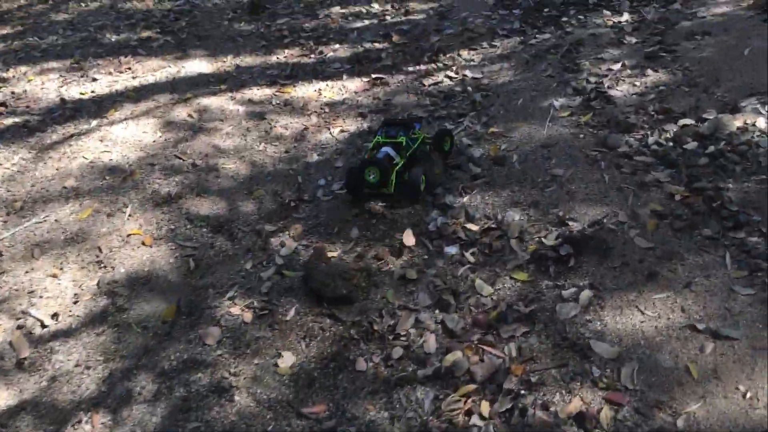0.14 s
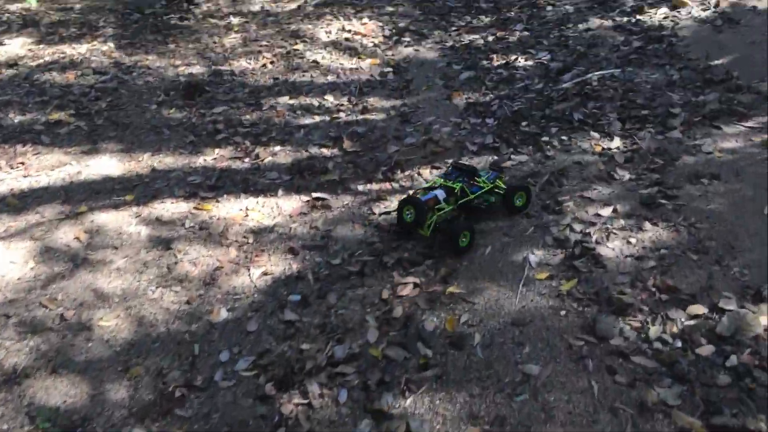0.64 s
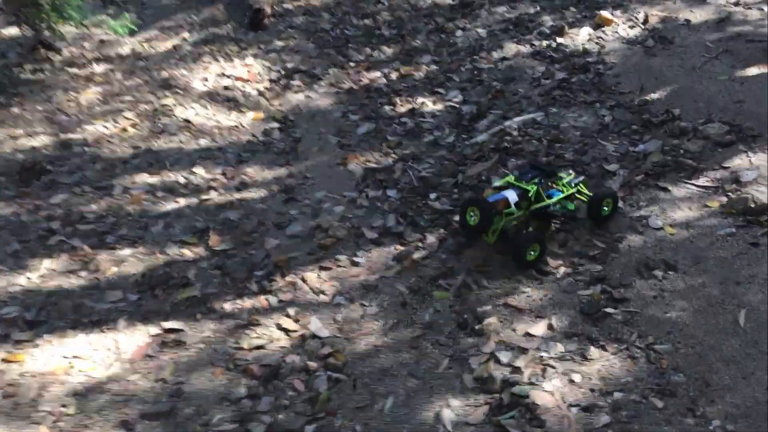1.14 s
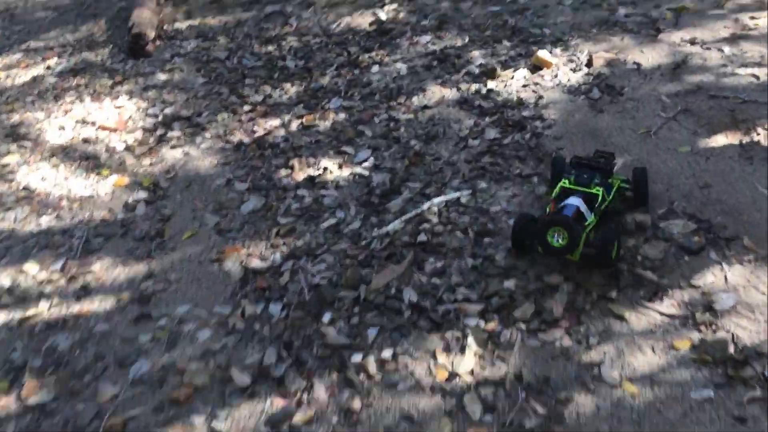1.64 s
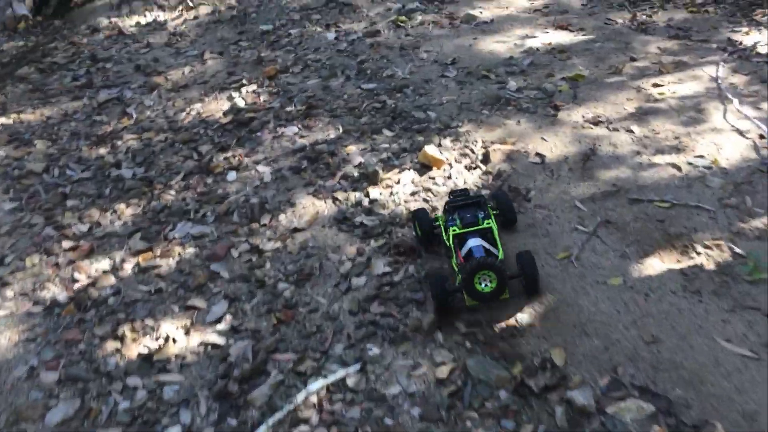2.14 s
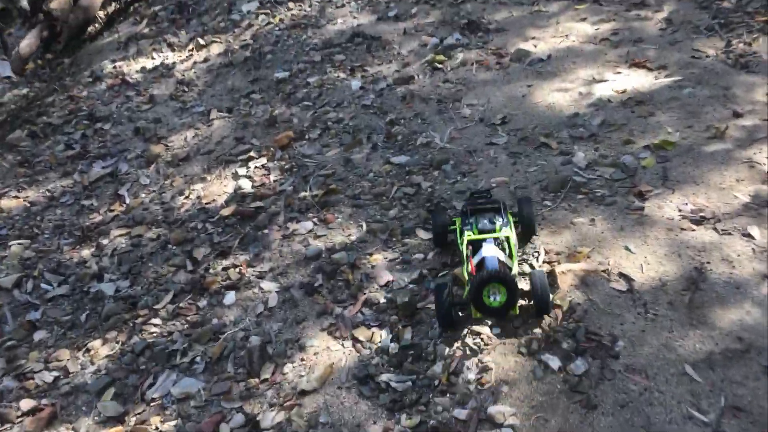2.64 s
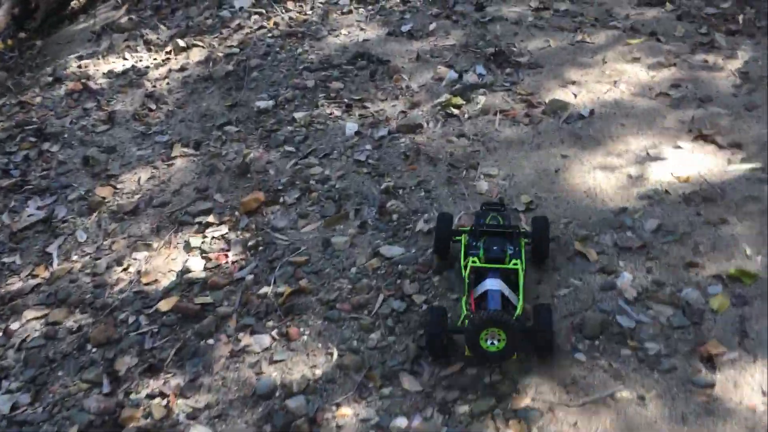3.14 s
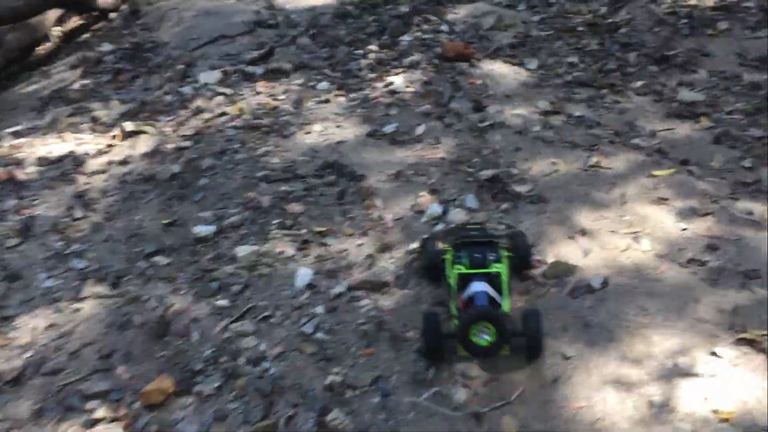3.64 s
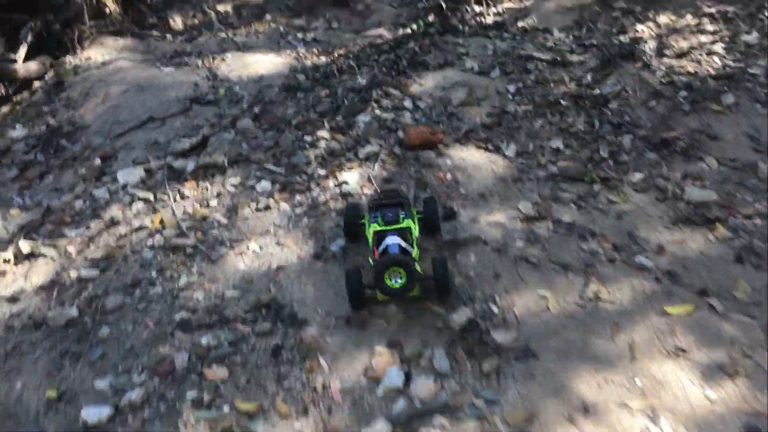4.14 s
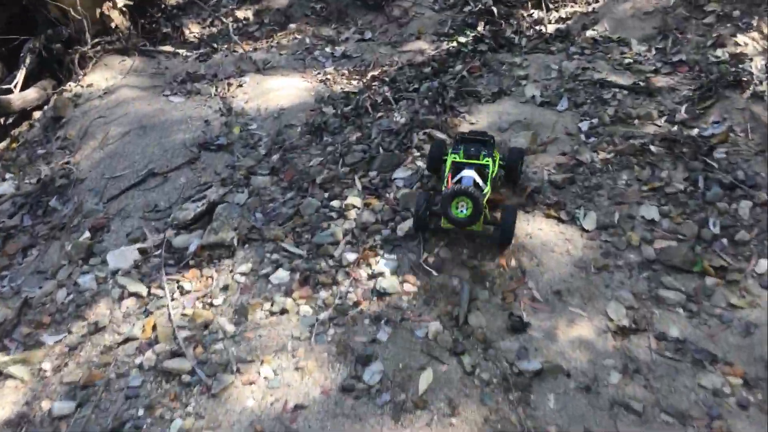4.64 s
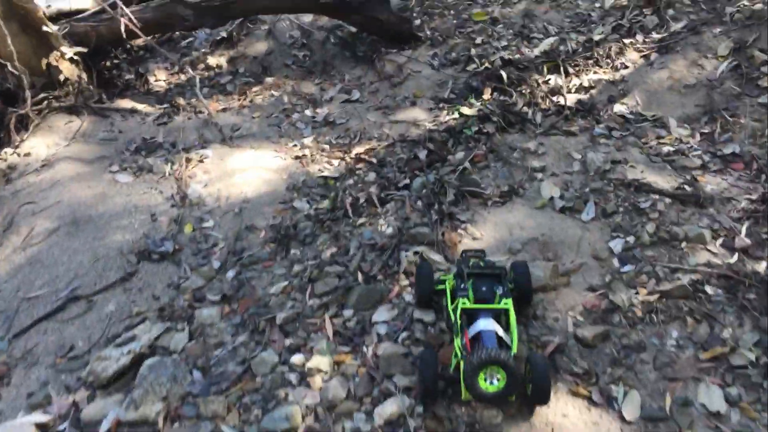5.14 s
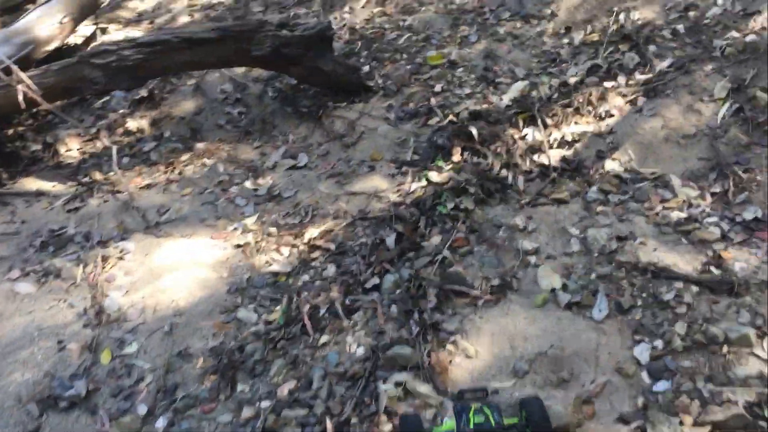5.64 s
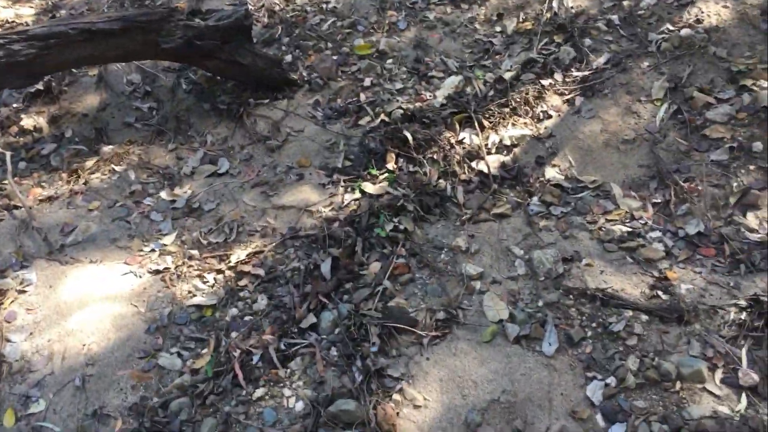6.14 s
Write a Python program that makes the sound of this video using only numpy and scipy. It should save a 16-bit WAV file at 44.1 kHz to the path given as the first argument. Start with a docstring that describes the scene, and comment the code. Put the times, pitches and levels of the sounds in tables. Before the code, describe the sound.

Close nasal gear whine and plastic chatter, tyres crunching leaves and gravel outdoors, a stone knock, a brief slack-geared raspy rattle, then near silence.

```python
"""A nasal gear whine and plastic rattle pass over crackling leaves: a small electric toy crawler, slow, close by.
Outdoors, hand-held microphone: faint air, wind thumps and ground rumble lie behind gravel and dry leaves.
Sine tones make the whine and the speed controller's whistle; random knocks ring the chassis resonances.
Filtered clicks and noise make grit and leaves; decaying modes make a flicked stone and the slapping shell.
Near the end it rolls back down a slope with slack gears, the shell slaps its posts, and it stops."""
import sys
import numpy as np
from scipy import signal
from scipy.io import wavfile
from scipy.ndimage import uniform_filter1d

SR = 44100
rng = np.random.default_rng(int(sys.argv[2]) if len(sys.argv) > 2 else 0)


def wav_record(signal):
    """Record a signal, one row per channel, as 16-bit PCM in the file named by sys.argv[1]."""
    frames = np.transpose(np.atleast_2d(signal))
    bounded = np.clip(frames, -1, 1)
    # unit amplitude maps onto the largest positive 16-bit level
    quanta = np.round(bounded * 32767).astype(np.int16)
    wavfile.write(sys.argv[1], SR, quanta)


def makeup_ratio(level_db):
    """Linear amplitude ratio for a level in decibels (20 dB per factor of ten)."""
    decades = np.asarray(level_db, float) / 20
    return 10 ** decades


N = 276066  # samples, 6.26 s

# still outdoor air: f/Hz, relative level per Hz/dB
AIR_COLOUR = [(15, -82), (25, 0.5), (104, -8), (165, -12), (247, -7.5), (315, -48), (498, -11.5),
              (602, -12), (1250, -22.5), (6810, -41), (15700, -85)]
# ground rumble of wheels and steps: t/s, level/dB
RUMBLE_LEVEL = [(0, -54.5), (1.06, -61), (1.57, -58), (2.32, -59.5), (2.7, -56), (4.58, -58.5),
                (5.04, -61.5), (6.26, -67)]
# colour of that rumble: f/Hz, relative level per Hz/dB
GROUND_COLOUR = [(15, -41), (25, -38), (59, 3.5), (151, 1), (283, 3.5), (369, 4), (480, -2.5), (617, -1.5),
                 (700, 0.5), (910, 3), (1540, -120)]
# thumps of wind on the microphone: t/s, level/dB, f/Hz
WIND_THUMPS = [(0.06, -37, 53.4), (0.32, -36, 87.2), (1.515, -29, 93.7), (3.598, -46, 86.1),
               (5.247, -33, 68.2)]
# whistle of the speed controller: t/s, level/dB
WHISTLE_LEVEL = [(.12, -55), (.8, -57), (.93, -50), (1.1, -49), (1.33, -49.5), (1.5, -54), (1.65, -48.5),
                 (1.85, -51), (2.03, -45.5), (2.3, -52), (2.55, -48), (2.65, -58), (2.72, -50), (2.85, -56),
                 (3.0, -49), (3.5, -52), (4.07, -48.5), (4.3, -48), (4.68, -49), (4.78, -50), (4.92, -48.5),
                 (5.15, -51)]
# its base pitch: t/s, f/Hz
WHISTLE_PITCH = [(0, 2024), (4.98, 2024), (5.03, 2029)]
# its harmonics: multiple of the base pitch, relative level/dB
WHISTLE_HARMONICS = [(1, -8), (2, 0), (3, -20), (4, -22)]
# steering servo holding still: t/s, level/dB
SERVO_LEVEL = [(5.9, -74), (6.04, -63), (6.08, -76), (6.26, -83)]
# tones of the servo: f/Hz, level/dB (used relative to the first)
SERVO_TONES = [(1227, -58), (2482, -68), (4904, -77)]
# tyres grinding grit: t/s, level/dB
GRIND_LEVEL = [(0, -41.5), (.85, -48), (1.3, -44.5), (1.55, -42), (1.64, -50.5), (1.8, -48), (2.03, -50),
               (2.4, -43), (2.58, -47), (2.65, -51), (2.76, -50.5), (2.9, -42), (2.97, -49), (3.3, -48),
               (3.7, -43.5), (4.2, -45.5), (4.97, -49.5), (5.05, -56), (5.35, -41), (5.8, -52.5),
               (5.95, -63.5), (6.25, -78.5)]
# colour of the grit: f/Hz, relative level per Hz/dB
GRIT_COLOUR = [(1180, -15), (2000, 4), (2440, 3.5), (2900, -2.5), (3850, 1.5), (4130, -0.5), (4950, -2),
               (8810, -2), (10300, -5.5), (12200, -3.5), (15700, -5.5)]
# leaves crushed under a tyre: middle t/s, level/dB, length/s, tilt of the lows/dB
LEAF_CRUNCHES = [(0.036, -48, 0.048, -8), (0.147, -40.5, 0.11, -4), (0.34, -41.5, 0.071, 3.5),
                 (0.399, -50, 0.019, -8), (0.454, -48.5, 0.12, -8), (0.481, -50.5, 0.029, 11),
                 (0.58, -49, 0.017, -7), (0.67, -38.5, 0.03, 1), (0.807, -44, 0.07, 5),
                 (0.926, -55, 0.027, 16), (1.08, -50, 0.0353, 14.5), (1.182, -49, 0.046, -5),
                 (1.263, -38.5, 0.035, 8.5), (1.352, -49, 0.022, 12), (1.527, -44, 0.015, -4),
                 (1.565, -42, 0.049, 2), (1.707, -38, 0.021, 4), (1.779, -49, 0.021, 4),
                 (1.847, -44, 0.0096, 1), (1.877, -42, 0.022, 5.5), (1.913, -45.5, 0.012, 11),
                 (1.929, -36, 0.016, -4), (1.953, -40, 0.013, -9), (2.023, -47, 0.014, -10),
                 (2.108, -39, 0.05, -3), (2.16, -51, 0.036, -6), (2.265, -45, 0.011, -7),
                 (2.411, -37.5, 0.06, 2.5), (2.466, -44, 0.043, 1), (2.542, -39, 0.024, -6),
                 (2.585, -48, 0.071, 0), (2.775, -49, 0.02, 12.5), (2.924, -42.5, 0.05, 8),
                 (3.051, -37, 0.047, 4), (3.107, -49, 0.03, -2), (3.57, -47, 0.043, 13),
                 (3.606, -43.5, 0.02, -1), (3.817, -37.5, 0.068, 6.5), (3.856, -39, 0.012, -10),
                 (4.007, -45.5, 0.092, -2), (4.203, -46.5, 0.04, 6), (4.365, -39.5, 0.017, 3.5),
                 (4.627, -47, 0.083, -7), (4.86, -53, 0.068, -11), (4.946, -44, 0.02, 8),
                 (4.995, -47, 0.017, 11), (5.272, -42.5, 0.04, 6), (5.328, -42, 0.023, -11),
                 (5.409, -34.5, 0.032, 5), (5.452, -42.5, 0.065, -4), (5.552, -45, 0.03, 4),
                 (5.64, -46, 0.087, -1), (5.745, -53, 0.035, 12), (5.89, -60, 0.014, 3),
                 (5.901, -59, 0.0096, 8.5)]
# colour of the leaves: f/Hz, relative level per Hz/dB
LEAF_COLOUR = [(350, -24.5), (600, -2.5), (1060, -0.5), (2350, -5.5), (3310, -4.5), (4120, -1.5),
               (5560, -0.5), (13300, -1.5), (15700, -16)]
# ticks of breaking leaf fragments, large to small: f/Hz
FRAGMENT_PITCHES = [2620, 3500, 4270, 5530, 7000, 8800, 11240, 12700, 15000]
# sharp cracks of a twig or leaf stem: t/s, peak/dB, f/Hz
STEM_CRACKS = [(0.1153, -17, 9000), (0.411, -19, 12800), (0.4471, -20, 7000), (.495, -21, 9130),
               (0.739, -27, 11020), (.7806, -33, 8000), (0.798, -32, 6000), (.804, -24, 11500),
               (1.159, -34, 7000), (1.363, -30, 9000), (1.4622, -31, 7000), (1.4965, -25, 8940),
               (1.527, -25, 12000), (1.5519, -21, 9500), (1.6774, -27, 10500), (1.7045, -27, 8970),
               (1.7685, -21, 12500), (1.8677, -31, 8030), (1.882, -28, 9230), (1.9237, -20, 10500),
               (1.932, -25, 9000), (1.952, -34, 6000), (2.0217, -20.5, 7600), (2.0882, -23, 6000),
               (2.105, -15.5, 12000), (2.1123, -16, 8800), (2.165, -20, 9000), (2.1877, -20.5, 9360),
               (2.5301, -27, 6000), (2.7678, -35, 3980), (2.9857, -33, 6000), (3.03, -16, 9260),
               (3.0505, -13, 9440), (3.0817, -24, 8990), (3.1004, -24, 11000), (3.3583, -25, 12000),
               (3.8572, -21, 12040), (4.359, -18, 6240), (4.8164, -34, 7000), (4.836, -24, 13400),
               (4.936, -22, 8600), (5.115, -26.5, 10200), (5.2564, -16, 12000), (5.688, -29, 7500),
               (5.9501, -36, 7700)]
# a stone flicked against the chassis, and its bounces: t/s, peak/dB
STONE_HITS = [(2.579, -8), (2.5888, -18), (2.6005, -27)]
# modes the stone excites: f/Hz, relative level/dB, t60/s
STONE_MODES = [(1500, -21, 0.034), (1916, 20.5, 0.0066), (2570, 3, 0.0067), (3720, 0, 0.016),
               (6000, -9, 0.007)]
# chassis groaning low as it settles: t/s, peak/dB, starting f/Hz, length/s, end pitch over starting pitch
SETTLING_GROANS = [(5.607, -39, 528.5, 0.03, 0.5), (5.705, -34.5, 524, 0.039, 0.4),
                   (5.844, -42.5, 482, 0.0072, 0.79), (5.896, -56, 400, 0.025, 1)]
# gear teeth taking up play: t/s, peak of the note/dB, starting f/Hz
TOOTH_CLACKS = [(0.12, -34.5, 1084), (0.149, -30, 1024), (.825, -40, 1390), (.865, -39.5, 1370),
                (1.115, -38, 1360), (1.139, -43, 1360), (1.16, -40, 1310), (1.204, -39, 1340),
                (1.235, -39, 1333), (1.265, -41, 1370), (1.575, -39.5, 1320), (1.783, -32, 1375),
                (2.194, -31, 1350), (2.228, -31, 1382), (2.276, -31, 1363), (2.321, -27, 1409),
                (2.345, -30, 1390), (2.398, -32, 1415), (2.419, -36, 1440), (2.624, -37, 1400),
                (2.657, -33, 1333), (2.684, -34.5, 1150), (2.725, -32.5, 1381), (3.057, -30.5, 1430),
                (3.112, -32, 1214), (3.206, -31, 1388), (3.228, -30, 1437), (3.278, -30, 1415),
                (3.303, -27.5, 1411), (3.33, -30, 1482), (3.372, -37, 1400), (3.415, -27.5, 1340),
                (4.64, -39, 1302), (5.117, -35, 1360), (5.148, -29.5, 1354), (5.229, -25.5, 1330),
                (5.269, -20, 1540), (5.28, -20.5, 1403), (5.343, -23, 1434), (5.541, -32.5, 985),
                (5.586, -32, 1290), (5.631, -28, 1198), (5.655, -22.5, 1063), (5.701, -32, 1243),
                (5.809, -33.5, 1445), (5.823, -31.5, 1200), (5.881, -40, 1310), (5.899, -42.5, 1120),
                (5.971, -47, 1240)]
# body shell slapping its posts while rolling back: t/s, peak/dB, approximate pitch of the struck panel f/Hz
SHELL_SLAPS = [(5.1791, -28, 4700), (5.1968, -29, 3570), (5.2144, -26.5, 3590), (5.232, -24.5, 3400),
               (5.27, -20, 4650), (5.282, -26, 5540), (5.308, -32, 3454), (5.3256, -28, 3390),
               (5.3635, -24.5, 8800), (5.3725, -31, 3490), (5.4005, -19.5, 3410), (5.4407, -39, 3402),
               (5.4591, -35, 3500), (5.5338, -29, 3510), (5.5724, -35, 3180), (5.5973, -27, 3390),
               (5.6605, -28.5, 3400), (5.7214, -47, 5300), (5.7403, -38, 5400), (5.7751, -33.5, 4140),
               (5.823, -44, 4500)]
# modes of the shell: f/Hz, relative level/dB, t60/s
SHELL_MODES = [(3400, -3, .015), (4680, -3, .014), (5590, -5, .014), (6730, -7, .012), (8760, -6, .012),
               (12000, -8, .008)]
# drive train shaking the chassis: t/s, level/dB
RATTLE_LEVEL = [(0, -46), (.13, -45.5), (.45, -50), (.85, -46.5), (1.5, -43.5), (1.64, -47), (1.8, -42),
                (2.08, -43.5), (2.6, -38), (2.75, -40), (2.9, -36), (2.97, -40), (3.5, -38.5),
                (3.64, -33.5), (3.77, -39), (4.5, -41.5), (5.0, -44.5), (5.04, -57), (5.09, -55),
                (5.15, -41.5), (5.28, -39), (5.297, -45), (5.33, -35), (5.36, -45.5), (5.405, -36.5),
                (5.43, -41.5), (5.46, -36), (5.53, -51), (5.6, -42), (5.68, -42.5), (5.78, -51.5),
                (5.83, -47.5), (5.87, -58), (6.0, -72.5), (6.26, -69.5)]
# chassis resonances: f/Hz, width/Hz, level under power re rattle/dB
CHASSIS = [(1000, 264, -10), (1438, 250, -8), (1800, 350, -7.5)]
# change of each chassis resonance once the gears run slack: level/dB
CHASSIS_SLACK = [4, 8.5, -0.5]
# loose shell and gear cover: f/Hz, width/Hz, level under power re rattle/dB, slope per octave of gear speed/dB,
# level rolling free re rattle/dB, slope rolling free/dB
LOOSE_PARTS = [(3483, 300, -19, 16, -19.5, 22.2), (4600, 970, -15, 15, -23, 14.7)]
# motor mount: f/Hz, width/Hz
MOUNT = (2890, 150)
# ring of the mount: t/s, level re rattle/dB
MOUNT_LEVEL = [(0, -8), (.5, -4), (1.15, -5.5), (1.35, -2.5), (1.6, -7.5), (1.9, -15), (2.3, -7.5),
               (2.62, -12), (2.9, -11), (3.3, -12.5), (3.75, -9.5), (4.5, -10), (4.7, -12.5), (5.1, -18.5),
               (6.26, -14)]
# low sway of the motor on its mount: f/Hz, width/Hz, level re the mount/dB
MOUNT_SWAY = (390, 100, -12.5)
# screech of the pinion: f/Hz, width/Hz
PINION = (4210, 630)
# level of the screech: t/s, level re rattle/dB
SCREECH_LEVEL = [(0, -6), (.1, 4), (.15, -15), (.6, -9), (3.4, -21), (3.7, -13), (4.1, -5.5), (4.35, -7.5),
                 (4.6, -7.5), (4.7, -13), (6.26, -22)]
# gear train, driven by the motor and at the end by the wheels rolling back: t/s, mean tooth rate f/Hz, load level/dB
GEAR_TRAIN = [(0, 944, -52), (.035, 964, -43), (.075, 821.3, -47), (.14, 1020, -59), (.19, 838, -42),
              (.4, 846, -51), (.62, 761, -52.5), (.71, 806, -47.5), (.75, 760, -54), (.8, 735, -52.5),
              (.94, 790, -44.5), (1.0, 704.5, -51), (1.08, 869, -47.5), (1.13, 720, -46),
              (1.22, 738, -44.5), (1.28, 687, -52), (1.33, 732.6, -46.5), (1.47, 790, -44),
              (1.57, 740, -46.5), (1.63, 598, -52), (1.7, 719, -47), (2.03, 523.6, -60), (2.2, 656.4, -47),
              (2.37, 680, -43.5), (2.47, 803, -42.5), (2.53, 693, -42), (2.62, 687.5, -43.5),
              (2.69, 578, -61), (2.73, 719, -50), (2.77, 674, -44), (2.81, 747, -51), (2.85, 900, -45),
              (2.88, 793, -49.5), (2.92, 1012, -39.5), (3.0, 626, -54), (3.19, 587.7, -65),
              (3.23, 708, -39.5), (3.27, 618.5, -48), (3.33, 738, -46), (3.37, 792, -43),
              (3.42, 675.4, -38.5), (3.46, 796, -39.5), (3.56, 1040, -52), (3.62, 875, -44.5),
              (3.76, 909.4, -46.5), (3.82, 813, -48.5), (3.88, 1013, -41), (4.04, 797.5, -43),
              (4.1, 884, -45.5), (4.36, 897, -48.5), (4.41, 775, -50), (4.45, 938, -44.5),
              (4.5, 803, -44.5), (4.63, 736, -42.5), (4.68, 706, -81), (5.16, 752, -87), (5.18, 829, -45),
              (5.21, 1000, -38), (5.245, 1123, -36.5), (5.28, 1500, -45), (5.33, 1715, -33),
              (5.44, 1723, -37), (5.6, 1313, -45.5), (5.77, 1148, -46.5), (5.8, 1081, -94)]
# octave of the tooth tone, before the chassis colours both: t/s, level re tooth tone/dB
OCTAVE_LEVEL = [(0, -1.5), (.5, -30), (.7, 1.5), (.85, -8), (1.0, -11), (1.2, -3.5), (1.35, -19),
                (1.48, -4), (1.6, -7.5), (2.0, 0), (2.35, -6), (2.62, -2), (2.72, 7), (2.85, -6),
                (2.93, -1), (3.0, 3), (3.1, 11.5), (3.3, -3), (3.42, -8), (3.47, -5.5), (3.65, 4),
                (4.0, -6), (4.6, -18), (5.2, -31), (5.42, -21), (5.6, 0)]
# higher overtones of the tooth tone: multiple, level re tooth tone/dB
OVERTONES = [(3, -22), (4, -20), (5, -22), (6, -27)]
# how well the chassis radiates a gear tone: f/Hz, gain/dB
CHASSIS_RADIATION = [(540, -9), (650, -16), (750, -2.5), (850, -0.5), (1050, 4), (1180, 5.5), (1380, 1.5),
                     (1560, -1), (1750, -3.5), (2100, -4), (2650, -20), (2890, -15), (3100, 8), (3300, 4),
                     (3600, 9), (3850, -29), (4300, 14), (4800, 15), (5600, -23)]

TEETH = 17  # tooth contacts per shaft turn
POWER_OFF_S = 5.06


def evened(x):
    """Scales to rms 1."""
    return x / np.sqrt(np.mean(x ** 2) + 1e-20)


def columns(rows):
    """Every column of a timed table, interpolated to one value per sample."""
    s, *rest = np.transpose(rows)
    return [np.interp(np.arange(N) / SR, s, c) for c in rest]


def gate(start_s, end_s, fade_s):
    """One between two moments, fading to zero outside."""
    return np.interp(np.arange(N) / SR, [start_s - fade_s, start_s, end_s, end_s + fade_s], [0, 1, 1, 0])


def drift(rate_hz):
    """Smooth chance of rms 1: noise below a low-pass corner at rate_hz."""
    low_pass = signal.butter(2, rate_hz, fs=SR, output="sos")
    return evened(signal.sosfilt(low_pass, rng.standard_normal(N)))


def coloured(x, points):
    """Causal minimum-phase filter of unit energy whose gain follows the shape of a (f/Hz, level/dB) table."""
    hz, db = np.transpose(points)
    log_gain = np.interp(np.log(np.fft.rfftfreq(4096, 1 / SR) + 1), np.log(hz), db) * np.log(10) / 20
    circle = np.r_[log_gain, log_gain[-2:0:-1]]
    taps = np.fft.ifft(np.exp(np.conj(signal.hilbert(circle)))).real
    return signal.oaconvolve(x, taps / np.linalg.norm(taps))[:N]


def resonate(x, hz, width):
    """A two-pole resonance of peak gain 1."""
    return signal.lfilter(*signal.iirpeak(hz, hz / width, SR), x)


def wandering(x, hz, width):
    """A steep resonance whose centre follows the curve hz: shift to zero, smooth twice, shift back."""
    turn = np.exp(2j * np.pi * np.cumsum(hz) / SR)
    r = np.exp(-np.pi * width / SR)
    return (turn * signal.lfilter([1], [1, -2 * r, r * r], x / turn)).real


def grains(per_s, spread_db):
    """Random clicks of either sign; a few are much larger than the rest."""
    size = makeup_ratio(spread_db * np.minimum(rng.exponential(1, N), 4)) * rng.choice([-1., 1.], N)
    return size * (rng.random(N) < per_s / SR)


def snapping(per_s, spread_db):
    """Each fragment breaks with a short tick at its own pitch."""
    ticks = [evened(resonate(grains(per_s, spread_db), hz, 0.15 * hz)) for hz in FRAGMENT_PITCHES]
    return evened(sum(ticks))


def radiated(hz):
    """Gain in dB of the chassis for a tone."""
    f, db = np.transpose(CHASSIS_RADIATION)
    return np.interp(np.log(hz), np.log(f), db)


def add(mix, s, sound):
    """Mixes a sound in at a moment."""
    part = mix[max(round(s * SR), 0):][:len(sound)]
    part += sound[:len(part)]


def outdoors():
    """Faint broadband noise of the place, and a lumpy low rumble through the ground."""
    air = makeup_ratio(-65.5) * evened(coloured(rng.standard_normal(N), AIR_COLOUR))
    lumpy = rng.standard_normal(N) * makeup_ratio(4.1 * drift(15.3))
    rumble = evened(coloured(lumpy, GROUND_COLOUR))
    return air + makeup_ratio(columns(RUMBLE_LEVEL)[0]) * rumble


def wind_thumps():
    """Dull thumps of wind on the microphone: low sines that swell and die within milliseconds."""
    out, t = np.zeros(N), np.arange(2000) / SR
    for s, db, hz in WIND_THUMPS:
        add(out, s, makeup_ratio(db) * np.sin(2 * np.pi * hz * t) * (t / 0.0062) * np.exp(1 - t / 0.0024))
    return out


def electronics():
    """Clean tones of the switching speed controller and, after the stop, of the servo."""
    turn = 2 * np.pi * np.cumsum(columns(WHISTLE_PITCH)[0] * (1 + 0.0012 * drift(12))) / SR
    whistle = sum(makeup_ratio(db + 2.0 * drift(9)) * np.sin(k * turn) for k, db in WHISTLE_HARMONICS)
    t = np.arange(N) / SR
    servo = sum(makeup_ratio(db - SERVO_TONES[0][1]) * np.sin(2 * np.pi * f * t) for f, db in SERVO_TONES)
    driving, holding = gate(0, 5.175, .02), gate(5.9, 7, .03)
    return makeup_ratio(columns(WHISTLE_LEVEL)[0]) * whistle * driving + makeup_ratio(columns(SERVO_LEVEL)[0]) * servo * holding


def tyres(crush_middle=0.42):
    """A bed of fine grit, and bursts of snaps while a leaf is crushed (crush_middle: share of its length)."""
    grit = evened(snapping(60, 3.2) + 1.7 * rng.standard_normal(N))
    grit = grit * makeup_ratio(1.6 * drift(29) + 1.8 * drift(9))
    bed = makeup_ratio(columns(GRIND_LEVEL)[0]) * coloured(grit, GRIT_COLOUR)
    burst, low = np.zeros(N), np.zeros(N)
    for s, db, length, tilt_db in LEAF_CRUNCHES:
        u = np.linspace(0, 1, round(length * SR)) ** (np.log(.5) / np.log(crush_middle))
        shape = makeup_ratio(db) * np.minimum(3.0 * np.sin(np.pi * u) ** 2, 1)  # flat-topped
        add(burst, s - length / 2, shape)
        add(low, s - length / 2, shape * (makeup_ratio(tilt_db) - 1))
    snaps = evened(snapping(350, 3.0) + 0.5 * evened(grains(2500, 3.6))) * makeup_ratio(2.6 * drift(90))
    leaf = coloured(snaps * burst, LEAF_COLOUR)
    # adds to or takes from the leaf below 4.5 kHz
    low_pass = signal.butter(2, 4500, fs=SR, output="sos")
    body = signal.sosfilt(low_pass, coloured(snaps * low, LEAF_COLOUR))
    return bed + leaf + body


def cracks():
    """A twig or stem snaps: a cosine from full level, falling 60 dB in 1.3 ms."""
    out, t = np.zeros(N), np.arange(2000) / SR
    for s, db, hz in STEM_CRACKS:
        add(out, s, makeup_ratio(db - 60 * t / .0013) * np.cos(2 * np.pi * hz * t))
    return out


def stone():
    """A stone strikes the chassis and bounces, each time exciting the same decaying modes."""
    out, t = np.zeros(N), np.arange(2000) / SR
    ring = sum(makeup_ratio(db - 60 * t / t60) * np.sin(2 * np.pi * hz * t) for hz, db, t60 in STONE_MODES)
    ring = ring * np.minimum(t / 0.00043, 1)  # contact time softens the onset
    for s, db in STONE_HITS:
        add(out, s, makeup_ratio(db) * ring / abs(ring).max())
    return out


def sliding_note(db, hz, length_s, glide):
    """A short sine whose pitch glides to glide times its start, under a smooth swell."""
    u = np.linspace(0, 1, round(length_s * SR))
    note = np.sin(2 * np.pi * np.cumsum(hz * glide ** u) / SR)
    return makeup_ratio(db) * np.sin(np.pi * u ** 0.51) ** 2 * note


def groans():
    """The settling chassis gives low notes, most of them sliding down."""
    out = np.zeros(N)
    for s, *note in SETTLING_GROANS:
        add(out, s, sliding_note(*note))
    return out


def clacks(loaded_s=.027, slack_s=.014, glide=.94, tick_db=-13.5):
    """Teeth take up play: a falling note, longer under power, with a tick near its onset that rings
    chassis, parts and mount."""
    out, t = np.zeros(N), np.arange(2000) / SR
    tick = sum(makeup_ratio(-60 * t * width / 0.89) * np.sin(2 * np.pi * hz * t)
               for hz, width, *_ in CHASSIS + LOOSE_PARTS + [MOUNT])
    for s, db, hz in TOOTH_CLACKS:
        length_s = slack_s if s > POWER_OFF_S else loaded_s
        add(out, s, sliding_note(db, hz, length_s, glide))
        add(out, s + 0.00148, makeup_ratio(db + tick_db) * tick / abs(tick).max())
    return out


def shell(slap_s=.014, taps_per_s=1200, panel_db=1, panel_t60_s=.016, vary_db=3.5, detune=.025):
    """Each slap is a short flurry of taps into the struck panel and the modes of the shell."""
    out, t = np.zeros(N), np.arange(1800) / SR
    u = np.linspace(0, 1, round(slap_s * SR))
    for s, db, panel_hz in SHELL_SLAPS:
        struck = rng.random(len(u)) < taps_per_s / SR
        taps = rng.standard_normal(len(u)) * struck * np.sin(np.pi * u ** 0.51)
        taps[40] += .8  # one sure tap
        modes = SHELL_MODES + [(panel_hz, panel_db, panel_t60_s)]
        where = rng.standard_normal((len(modes), 2))  # each slap lands elsewhere and favours other modes
        ring = sum(makeup_ratio(mode_db + vary_db * a - 60 * t / t60) * np.sin(2 * np.pi * hz * (1 + detune * b) * t)
                   for (hz, mode_db, t60), (a, b) in zip(modes, where))
        slap = np.convolve(taps, ring)
        add(out, s, makeup_ratio(db) * slap / abs(slap).max())
    return out


def rattle(taps_per_s=650, hiss=0.5, clump_db=2.1, beat_db=-1.5, cruise_hz=780, flex=.011, flex_hz=9):
    """Small knocks of the drive train ring each resonance in its own clumps, beating at half the shaft speed."""
    teeth_hz = columns(GEAR_TRAIN)[0]
    powered = gate(0, POWER_OFF_S, 0.04)
    slack = 1 - powered
    octaves = np.log2(uniform_filter1d(teeth_hz, size=5000) / cruise_hz)
    # every resonance as centre f/Hz, width/Hz, level/dB
    rings = [(hz, width, db + slack * slack_db)
             for (hz, width, db), slack_db in zip(CHASSIS, CHASSIS_SLACK)]
    for hz, width, db, slope, free_db, free_slope in LOOSE_PARTS:
        part_db = powered * (db + slope * octaves) + slack * (free_db + free_slope * octaves)
        rings.append((hz, width, part_db))
    mount_db = columns(MOUNT_LEVEL)[0]
    sway_hz, sway_width, sway_db = MOUNT_SWAY
    rings += [(*MOUNT, mount_db), (sway_hz, sway_width, sway_db + mount_db)]
    rings.append((*PINION, columns(SCREECH_LEVEL)[0]))
    # the shell buzzes between slaps, 40 dB weaker under power
    rings += [(hz, 2.5 * np.log(1000) / (np.pi * t60), db - 11 - 40 * powered)
              for hz, db, t60 in SHELL_MODES[1:]]
    half_shaft = np.pi * np.cumsum(teeth_hz / TEETH) / SR
    shared_db, out = 1.2 * drift(25), np.zeros(N)
    for hz, width, db in rings:
        drive = evened(grains(taps_per_s, 3.3)) + hiss * rng.standard_normal(N)
        centre = hz * (1 + flex * drift(flex_hz))  # the flexing chassis detunes it
        ring = evened(wandering(drive, centre, 1.56 * width))  # widened, as the double pole narrows
        beat = beat_db * np.sin(half_shaft + 2 * np.pi * rng.random())
        out += makeup_ratio(db + clump_db * drift(28.0) + shared_db + beat) * ring
    return makeup_ratio(columns(RATTLE_LEVEL)[0]) * out


def whine(wobble=.031, runout=0.038, throb=0.42, flutter_db=2.5):
    """Tooth contact tone, octave and overtones; an off-centre gear and uneven load shake pitch and level."""
    hz, load_db = columns(GEAR_TRAIN)
    shaft = 2 * np.pi * np.cumsum(hz / TEETH) / SR
    chatter = .11 * gate(5.3, 7, .05) * drift(300)  # unloaded teeth chatter, the tone turns to a rasp
    hz = hz * (1 + chatter + wobble * drift(38.47) + runout * np.sin(shaft / 2))
    turn = 2 * np.pi * np.cumsum(hz) / SR
    tone_level = makeup_ratio(load_db + radiated(hz) + flutter_db * drift(21.4))
    tone = tone_level * (1 + throb * np.sin(shaft)) * np.sin(turn)
    octave_level = makeup_ratio(load_db + columns(OCTAVE_LEVEL)[0] + radiated(2 * hz) + 4.7 * drift(65))
    octave = octave_level * (1 + 0.24 * np.sin(shaft / 2 + 1.37)) * np.sin(2 * turn)
    buzz = sum(makeup_ratio(load_db + db + radiated(k * hz) + 1.5 * drift(60)) * np.sin(k * turn)
               for k, db in OVERTONES)
    return np.sqrt(2) * (tone + octave + gate(0, POWER_OFF_S, .03) * buzz)


def scene():
    """The place, then the close crawler with a weak scattered tail; wind thumps share that tail."""
    place = outdoors()
    close = wind_thumps() + electronics() + tyres() + cracks() + stone() + groans() + clacks()
    close = close + shell() + rattle() + whine()
    t = np.arange(2500) / SR
    # scatter starts 3 ms after the direct sound and falls 60 dB in 80 ms
    scatter = rng.standard_normal(len(t)) * makeup_ratio(-60 * t / .08) * (t > .003)
    echoes = signal.oaconvolve(close, scatter / np.linalg.norm(scatter))[:N]
    return (close + makeup_ratio(-22.0) * echoes + place)[None]


def top_cut(x):
    """Nothing passes above the cut-off."""
    return signal.sosfilt(signal.butter(12, 16600, fs=SR, output="sos"), x)


def record(dry):
    """Low cut at 42 Hz, then a steep band limit at 15.95 kHz."""
    low_cut = signal.butter(3, 42, "high", fs=SR, output="sos")
    cut = signal.sosfilt(low_cut, dry)
    limited = signal.oaconvolve(cut, signal.firwin(401, 15950, fs=SR)[None], "same")
    return top_cut(limited)


dry = scene()
out = record(dry)
wav_record(out)
```